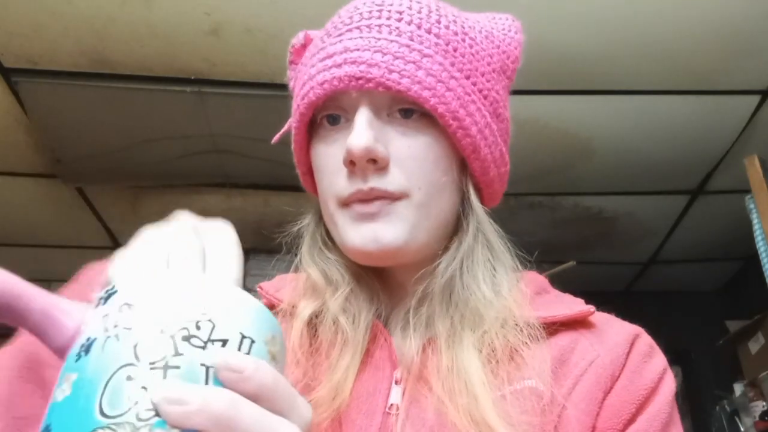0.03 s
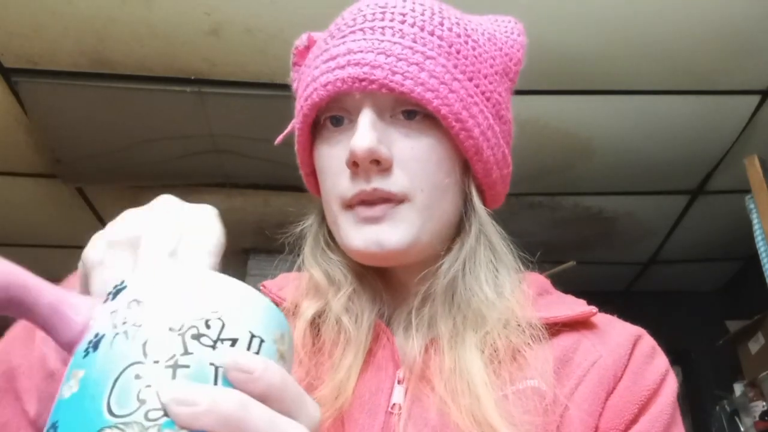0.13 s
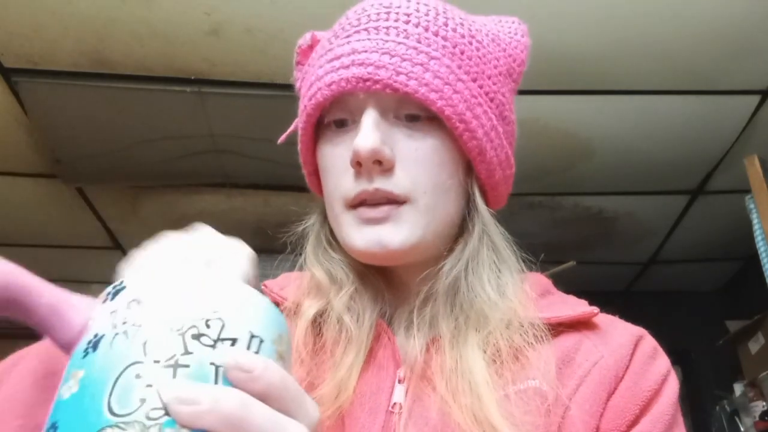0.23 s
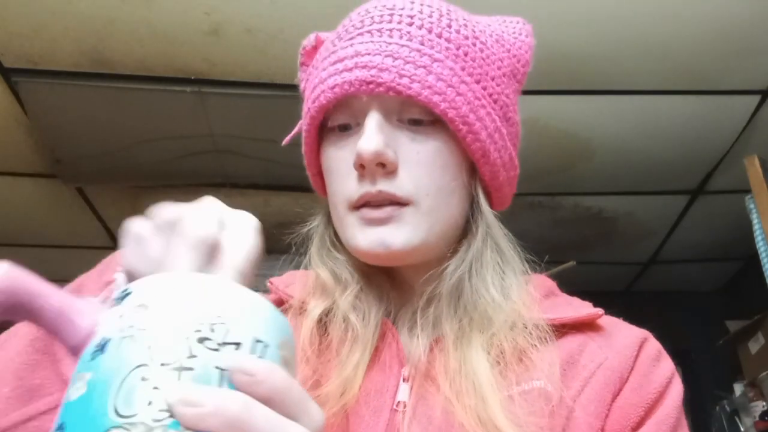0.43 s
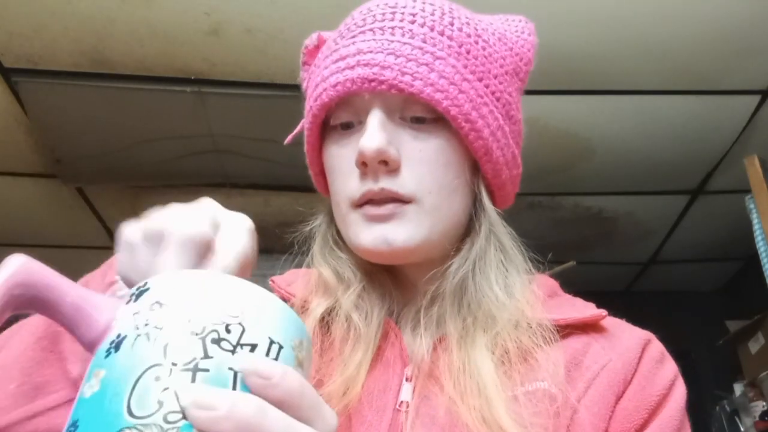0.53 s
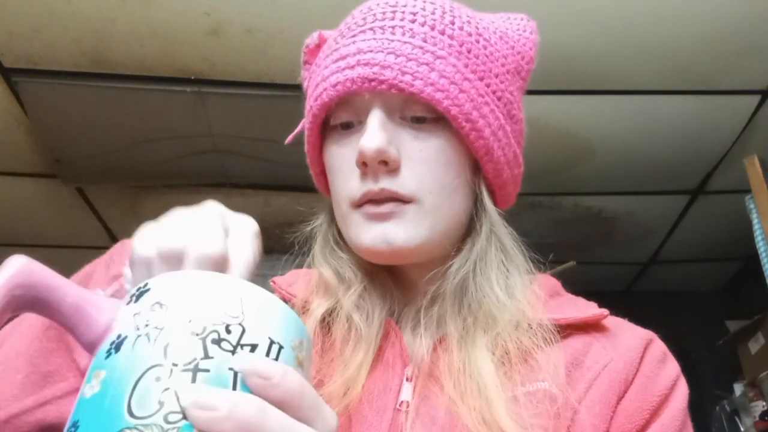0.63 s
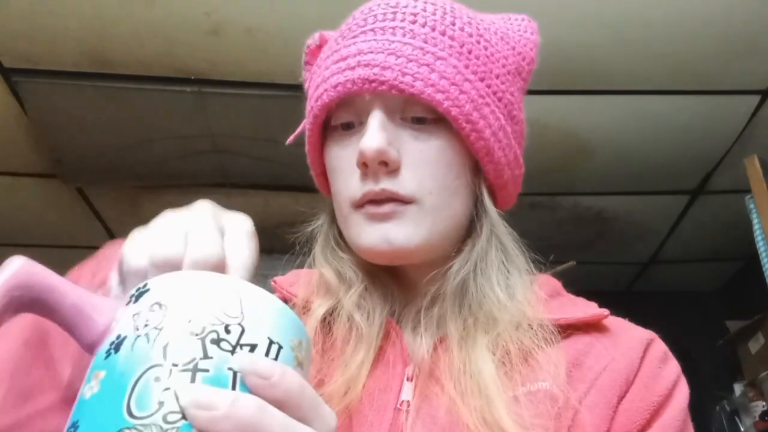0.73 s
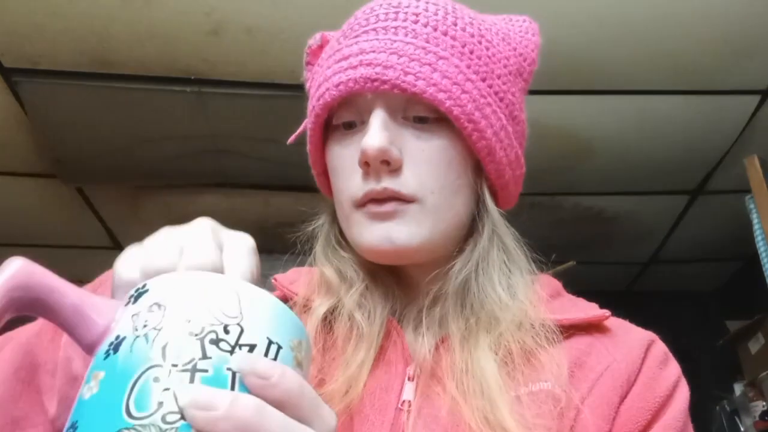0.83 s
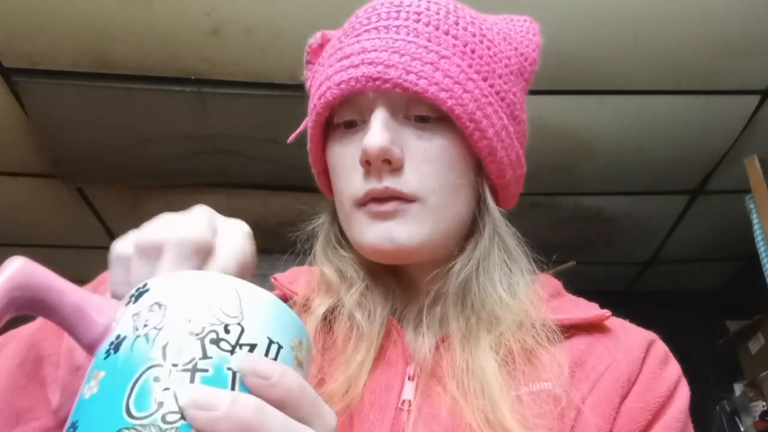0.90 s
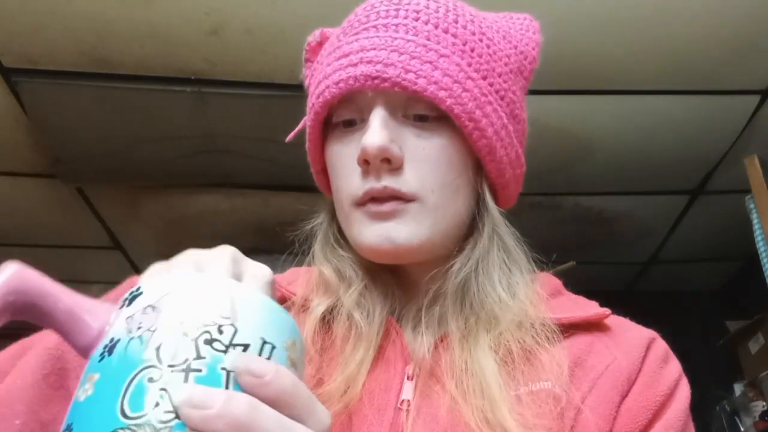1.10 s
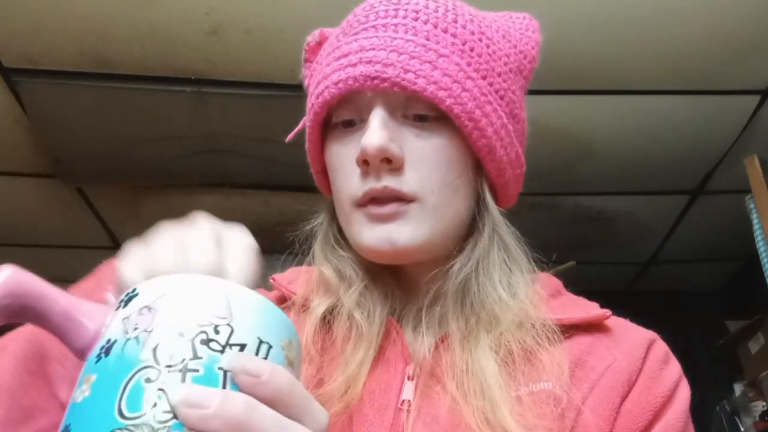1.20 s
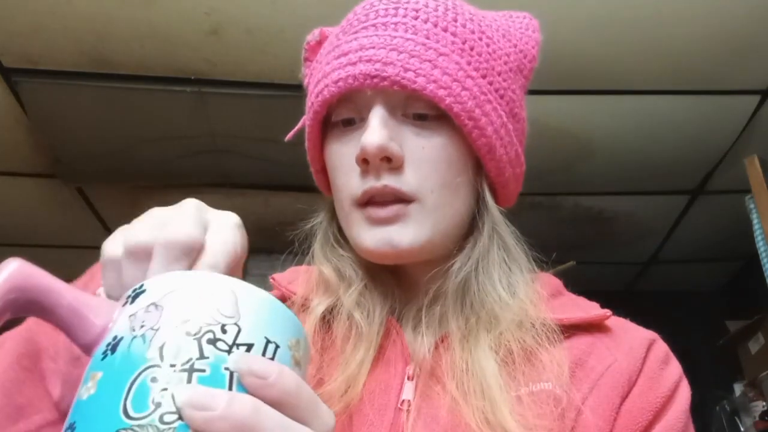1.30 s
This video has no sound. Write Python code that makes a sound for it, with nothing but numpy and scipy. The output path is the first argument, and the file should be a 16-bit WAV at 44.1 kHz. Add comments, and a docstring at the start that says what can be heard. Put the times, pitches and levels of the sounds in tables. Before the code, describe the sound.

A metal spoon stirs dry flour mix in a ceramic mug, close by. It opens with a soft, hollow, gritty scrape. Quick irregular taps follow, with the loudest ringing clinks at about 0.25 and 0.6 seconds. A tiny squeak comes at 0.7 seconds and a soft thud at 0.9, then lighter taps and scrapes continue until about 1.3 seconds. A faint electrical hum lies underneath.

```python
"""First comes a soft, gritty scrape with a hollow note: a metal spoon stirs dry flour mix in a
hand-held ceramic mug, close by in a small kitchen. Pushes into the mix sound the air in the mug or
thud on its bottom. Each tap rings the wall, clacks the gripped spoon and crushes a little flour.
Between taps the spoon drags along the wall, and now and then its edge squeaks on the glaze.
Mains hum and faint room noise lie below."""
import sys
import numpy as np
from scipy import signal
from scipy.fft import rfft, irfft
from scipy.io import wavfile

SR = 44100
rng = np.random.default_rng(int(sys.argv[2]) if len(sys.argv) > 2 else 0)


def wrap_up_sound(samples):
    """Save the sound to the file named by the first command line argument, as 16-bit audio."""
    columns = np.atleast_2d(samples).T
    # keep every value between -1 and 1, then stretch to whole-number steps
    tamed = np.clip(columns, -1, 1)
    steps = np.round(tamed * 32767).astype(np.int16)
    wavfile.write(sys.argv[1], SR, steps)


N = 59535
T = np.arange(N) / SR
HZ = np.maximum(np.fft.rfftfreq(2 * N, 1 / SR), 1)

# A decay (t60) is the time to fade by 60 dB. Pan is how much louder the left is than the right.
# The spoon drags on the wall: (start [s], length [s], grit level [dB], ring level [dB], pan [dB])
DRAGS = [(0, 0.056, -51, -62, -0.5), (0.077, 0.037, -63, -90, -3), (0.142, 0.039, -50, -86, -2.5),
         (0.2, 0.014, -31, -40, -3), (0.366, 0.039, -46.5, -46.5, 1.5), (0.494, 0.023, -57.5, -80, -7),
         (0.598, 0.015, -29.5, -32, 0), (0.71, 0.012, -45, -83, 2), (0.8, .045, -59, -79, 0),
         (0.948, 0.13, -69, -80.5, -0.5), (1.066, 0.13, -92, -68, 3.5), (1.162, 0.062, -65, -59, 1),
         (1.218, 0.029, -65, -71.5, 0.5)]
# Tone colour of crunching flour: (frequency [Hz], level [dB])
GRIT_COLOUR = [(60, -27), (250, -14), (600, -11), (1000, -13), (2100, -8.5), (3000, -1.5), (3750, 11),
               (5100, -12), (6600, 7), (8300, -11), (10500, -6.5), (13000, -9.5), (14900, -2.5),
               (16500, -10)]
# Notes of the rubbed wall: (pitch [Hz], level [dB], decay [s])
RUB_NOTES = [(1744, -3, .18), (3468, 1, .14), (3686, -7, .04), (4432, -10, .04), (5841, -15, .05)]
# Air in the mug, retuned by hand and spoon:
# (time [s], low pitch [Hz], low level [dB], high pitch [Hz], high level [dB])
HOLLOW_PUSHES = [(0, 598, -40.5, 1300, -46.5), (.0155, 644.8, -29, 1183, -27.5),
                 (.019, 554.4, -34.5, 1423, -35), (.0325, 550.2, -34.5, 1247, -57.5),
                 (.042, 502, -37, 1110, -67), (.147, 605.4, -50, 1733, -68), (.158, 590, -41.5, 1215, -53),
                 (.352, 500, -78, 1452, -45), (.498, 582, -55.5, 1250, -77), (.6925, 626, -38.5, 1290, -60),
                 (.711, 648, -40.5, 1250, -78), (1.149, 878, -56, 1400, -49)]
# The spoon meets the bottom through the flour: (time [s], level [dB])
BOTTOM_HITS = [(.016, -66), (.693, -47.5), (0.914, -34.5), (.941, -54), (1.003, -47), (1.215, -53.5)]
# Notes of the mug's bottom: (pitch [Hz], level [dB], decay [s])
BOTTOM_NOTES = [(150, -4, 0.023), (228, -5.5, 0.033), (400, 0, .02), (630, 0, 0.0074)]
# Tone colour of the room noise: (frequency [Hz], level [dB])
ROOM_NOISE_COLOUR = [(15, -56), (25, -31.5), (120, -3.5), (317, -11), (1740, -27.5), (2000, -33.5),
                     (3720, -31.5), (5000, -32.5), (6050, -40.5), (14800, -42), (16000, -27.5)]
# The spoon hits the wall: (time [s], mug level [dB], mug brightness [dB/octave], spoon level [dB],
# crack level [dB], crack brightness [dB/octave], crack resonance [Hz], pan [dB])
WALL_HITS = [(0.1456, -68.5, 5, -40.5, -40, 2.5, 8000, -2.5), (.2055, -61, 5, -33.5, -52, -16, 6300, -8),
             (.2364, -26.5, 2, -10, -14.5, -1, 3660, -2), (.2965, -54, -6.5, -62, -38.5, 1, 15000, 0.5),
             (.3520, -45.5, 9, -31, -24.5, 6.5, 8150, -1.5), (.3770, -53.5, -13, -34, -40, 7, 4500, -3),
             (.4973, -70, -8.5, -65, -49.5, -1.5, 6900, -3),
             (.5760, -51.5, -15, -23, -24.5, 3, 14900, -3.5), (.6022, -20, 4.5, -15, -11.5, 2, 6370, 0),
             (.6923, -55.5, -1.5, -47, -33.5, 2.5, 7850, -4.5),
             (.7190, -86, 4, -43, -46, -2.5, 8000, -12.5), (.8091, -67.5, 3, -40.5, -42, 1, 3590, -5),
             (.9145, -66.5, -6.5, -81, -50.5, -2.5, 4500, -8), (.9418, -79, -3, -73, -56.5, 1, 9920, -10),
             (.9590, -76, 21, -84, -42, 2.5, 2900, -1.5), (1.0015, -65, 4.5, -55, -58, -4.5, 4380, -14),
             (1.072, -65, 5.5, -74, -73, -6, 6050, 8), (1.1054, -74.5, -2, -69, -58.5, -9, 3930, -2),
             (1.1692, -57, -3.5, -71, -61, -16, 3300, -3)]
# Notes of the ceramic wall and the air inside: (pitch [Hz])
MUG_PITCHES = [612, 1120, 1744, 2444, 3468, 4432, 5330, 5841, 6220, 9190, 12774, 15340]
# How each of those mug notes rings: (level [dB], decay [s])
MUG_RINGS = [(-31, 0.24), (-30, .13), (-11.5, 0.21), (-18, 0.15), (-3, 0.17), (-14.5, 0.11), (-23, 0.037),
             (-8, 0.084), (-22.5, .11), (-29, 0.21), (-26.5, .18), (-24, 0.17)]
# Notes of the spoon: (pitch [Hz])
SPOON_PITCHES = [3330, 3684, 3775, 5800, 6340, 6516, 7060, 14756, 15150]
# How each spoon note rings, damped by the fingers: (level [dB], decay [s])
SPOON_RINGS = [(-17, 0.0091), (1, 0.036), (-9.5, 0.01), (-18, 0.013), (-12.5, .02), (-1.5, 0.022),
               (-21.5, 0.07), (-8, 0.047), (-11.5, .018)]
# Tone colour of the crack that starts a tap: (frequency [Hz], level [dB])
CRACK_COLOUR = [(25, -51), (250, -23.5), (600, -14), (1400, -7), (2100, -7.5), (3000, -2.5), (3900, 4),
                (5100, -8.5), (6500, 2.5), (8000, -12), (9700, -1.5), (13000, -12), (15000, -8.5),
                (16500, -25.5)]
# The spoon's edge skids on the glaze: (time [s], pitch [Hz], level [dB], decay [s])
SQUEAKS = [(.692, 4112, -20.5, 0.019), (0.6945, 9600, -34.5, 0.014), (.85, 8220, -60.5, .04),
           (.958, 9730, -42.5, 0.028), (.958, 15100, -40, 0.027), (1.064, 5880, -61.5, 0.1),
           (1.103, 5920, -55.5, 0.16), (1.145, 3936, -49.5, 0.12), (1.232, 7690, -59.5, 0.06)]
# Tone colour of the echoes: (frequency [Hz], level [dB])
ECHO_COLOUR = [(150, -4), (600, 6), (3500, -2.5), (7000, -3), (15000, -0.5)]

SHARP_RISE_S = 0.00025
CONTACT_LIKENESS = 0.68   # how alike left and right are in scrapes and cracks, from 0 to 1


def from_db(db):
    """Turns decibels into a number to multiply by."""
    return 10 ** (np.asarray(db) / 20)


def panned(x, db):
    """Leans a sound to the left, or to the right if db is negative."""
    return x * from_db(np.array([[db], [-db]]) / 2)


def coloured(x, colour, tilt_db=0):
    """Gives white noise or clicks a tone colour, tilted by tilt_db per octave, at the same power."""
    hz, db = np.transpose(colour)
    gain = from_db(np.interp(np.log(HZ), np.log(hz), db) + tilt_db * np.log2(HZ))
    return irfft(rfft(x, 2 * N) * gain / np.sqrt(np.mean(gain ** 2)))[..., :N]


def stereo(pair, likeness):
    """Mixes two unrelated signals into a partly alike left and right."""
    middle = np.sqrt(1 + likeness) * pair[0]
    sides = np.sqrt(1 - likeness) * pair[1] * np.array([[1], [-1]])
    return (middle + sides) / np.sqrt(2)


def noise(likeness):
    """An even hiss (white noise) in stereo."""
    return stereo(rng.standard_normal((2, N)), likeness)


def fade(start, rise, t60):
    """A quick swell, then a smooth dying away; all times are in seconds."""
    age = np.maximum(T - start, 0)
    return (1 - np.exp(-age / rise)) * np.exp(-np.minimum(np.log(1000) * age / t60, 10 * np.pi))


def ring(start, notes, rise=SHARP_RISE_S):
    """A struck object rings with fading pure tones; every second one is flipped."""
    return sum((-1) ** k * from_db(db) * fade(start, rise, t60) * np.sin(2 * np.pi * hz * (T - start))
               for k, (hz, db, t60) in enumerate(notes))


def rough_tone(hz, width_hz):
    """A tone that wavers at random, which smears its pitch over a narrow band."""
    wander = np.cumsum(rng.standard_normal(N)) * np.sqrt(2 * np.pi * width_hz / SR)
    return np.sin(2 * np.pi * hz * T + wander)


def through(x, response):
    """Plays a sound through an object or room, given how that answers a single click."""
    return signal.fftconvolve(np.atleast_2d(x), np.atleast_2d(response), axes=1)[:, :N]


def scrapes():
    """Flour grains crunch under the dragged spoon, and the wall sings faintly."""
    grains_per_s, spread_db, rise_s = 5500, 2.5, 0.0024
    grains = (rng.random((2, N)) < grains_per_s / SR) * rng.choice([-1, 1], (2, N))
    grains = grains * from_db(spread_db * np.minimum(rng.exponential(1, (2, N)), 4))
    grains = stereo(grains / grains.std(), CONTACT_LIKENESS)
    grit = rub = 0
    for start, length, grit_db, ring_db, pan_db in DRAGS:
        swell = np.clip((T - start) / rise_s, 0, 1)
        past_middle = np.maximum(T - start - length / 2, 0)
        fall_s = 0.006 + length / 4
        stroke = panned(swell * np.exp(-past_middle / fall_s), pan_db)
        grit = grit + from_db(grit_db) * stroke
        rub = rub + from_db(ring_db) * stroke
    wall = ring(0, RUB_NOTES)
    return grit * coloured(grains, GRIT_COLOUR) + through(rub * grains, wall / np.linalg.norm(wall))


def mug_body(x):
    """The mug's crowd of short, weak notes colours half the power of the contact noise."""
    crowd = rng.standard_normal(N) * fade(0, SHARP_RISE_S, t60=0.0069)
    return np.sqrt(0.5) * (x + through(x, crowd / np.linalg.norm(crowd)))


def hollow_notes():
    """Each soft push makes the air in the mug ring with two unsteady notes."""
    out = 0
    for start, low_hz, low_db, high_hz, high_db in HOLLOW_PUSHES:
        for hz, db, t60 in ((low_hz, low_db, 0.046), (high_hz, high_db, 0.045)):
            out = out + from_db(db) * fade(start, rise=0.0019, t60=t60) * rough_tone(hz, width_hz=24)
    return out


def background():
    """A slightly wavering mains hum over quiet room noise."""
    hum_hz, hum_db, wavers_per_s, noise_db = 120, -62.5, 18, -69.5
    waver_db = 1.5 * np.interp(T * wavers_per_s, np.arange(200), rng.standard_normal(200))
    hum = from_db(hum_db + waver_db) * np.sqrt(2) * np.sin(2 * np.pi * hum_hz * T)
    return hum + from_db(noise_db) * coloured(noise(likeness=0.27), ROOM_NOISE_COLOUR)


def thuds():
    """The spoon bumps the bottom through the flour and sets off low, short notes."""
    times, levels_db = np.transpose(BOTTOM_HITS)
    clicks = np.bincount((times * SR).astype(int), from_db(levels_db), N)
    return through(clicks, ring(0, BOTTOM_NOTES, rise=0.0007))


def taps():
    """Every tap rings the mug, brighter or duller by where it lands, and clacks the spoon."""
    main_note_hz, air_notes_below_hz = 3468, 1500
    pitches = np.array(MUG_PITCHES)
    # Brightness tilts the wall's notes around the main one and leaves the air's notes alone.
    octaves = np.clip(np.log2(pitches / main_note_hz), -1, 1) * (pitches > air_notes_below_hz)
    spoon = [(hz, db, t60) for hz, (db, t60) in zip(SPOON_PITCHES, SPOON_RINGS)]
    out = 0
    for start, mug_db, tilt_db, spoon_db, *_, pan_db in WALL_HITS:
        mug = [(hz, db + tilt_db * up, t60) for hz, up, (db, t60) in zip(pitches, octaves, MUG_RINGS)]
        tap = from_db(mug_db) * ring(start, mug) + from_db(spoon_db) * ring(start, spoon)
        out = out + panned(tap, pan_db)
    return out


def cracks():
    """A tap starts with a burst of chatter and crushed flour; each spot boosts a pitch of its own."""
    boost_db, width_octaves = 9.5, 0.17
    hiss = noise(CONTACT_LIKENESS)
    colour_hz, colour_db = np.transpose(CRACK_COLOUR)
    hz = np.geomspace(colour_hz[0], colour_hz[-1], num=300)
    shared_db = np.interp(np.log(hz), np.log(colour_hz), colour_db)
    out = 0
    for start, *_, db, tilt_db, peak_hz, pan_db in WALL_HITS:
        peak_db = boost_db * np.exp(-(np.log2(hz / peak_hz) / width_octaves) ** 2)
        chatter = coloured(hiss, np.transpose([hz, shared_db + peak_db]), tilt_db)
        out = out + panned(from_db(db) * fade(start, rise=0.0003, t60=0.028) * chatter, pan_db)
    return out


def squeaks():
    """Metal skids on glaze in short, rough squeaks; the longer ones swell more slowly."""
    return sum(from_db(db) * fade(start, rise=0.057 * t60, t60=t60) * rough_tone(hz, width_hz=90.4)
               for start, hz, db, t60 in SQUEAKS)


def kitchen(x):
    """Adds quick echoes from mug, hand and body, then the room's short tail."""
    nearby, room = (-6.5, 0, 0.032), (-13.5, 0.003, 0.19)   # (level [dB], delay [s], decay [s])
    echoes = 0
    for db, delay, t60 in (nearby, room):
        tail = coloured(noise(likeness=0.45), ECHO_COLOUR) * fade(delay, SHARP_RISE_S, t60)
        echoes = echoes + from_db(db) * tail / np.linalg.norm(tail, axis=1, keepdims=True)
    return x + through(x, echoes)


def scene():
    """The stirring in its kitchen, over the hum and room noise."""
    stirring = taps() + squeaks() + mug_body(cracks() + scrapes()) + hollow_notes() + thuds()
    return kitchen(stirring) + background()


def record(dry):
    """Cuts off the very highest treble steeply."""
    cutoff_hz = 16000
    return signal.sosfilt(signal.ellip(10, 0.2, 70, cutoff_hz, fs=SR, output="sos"), dry)


dry = scene()
out = record(dry)
wrap_up_sound(out)
```